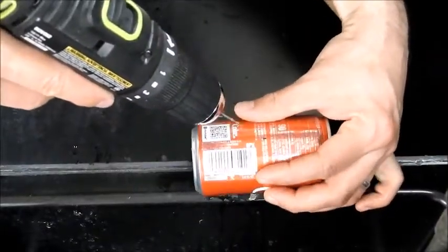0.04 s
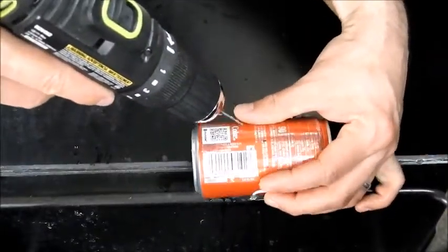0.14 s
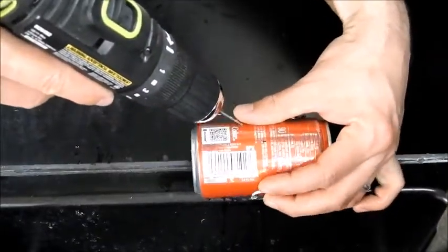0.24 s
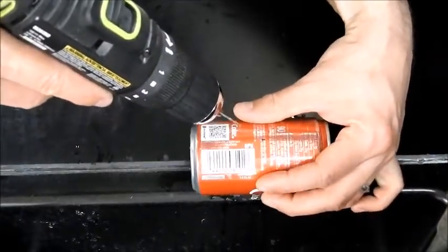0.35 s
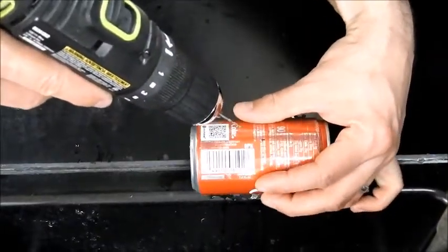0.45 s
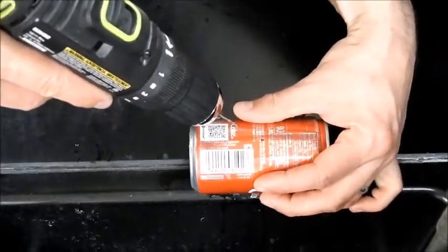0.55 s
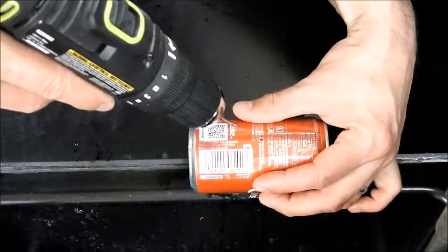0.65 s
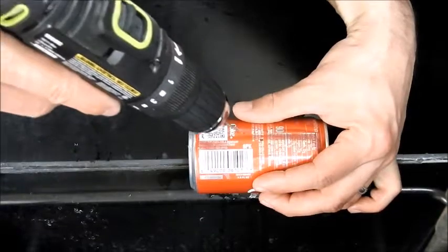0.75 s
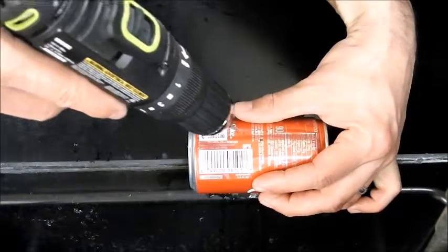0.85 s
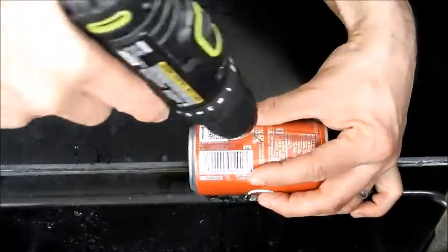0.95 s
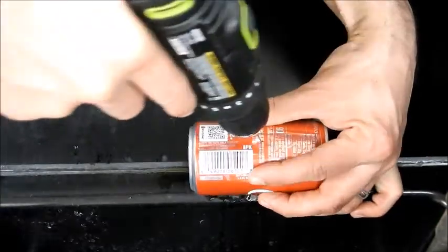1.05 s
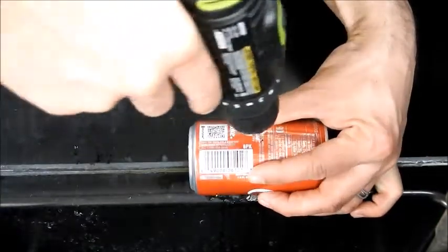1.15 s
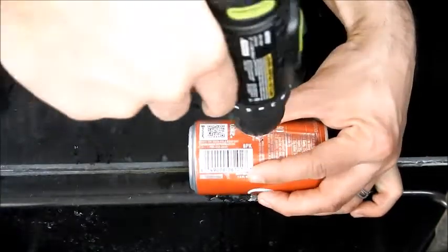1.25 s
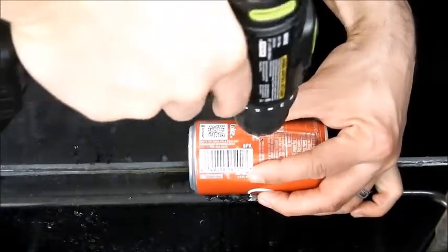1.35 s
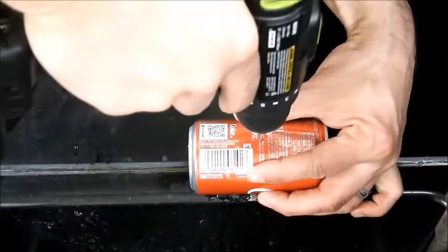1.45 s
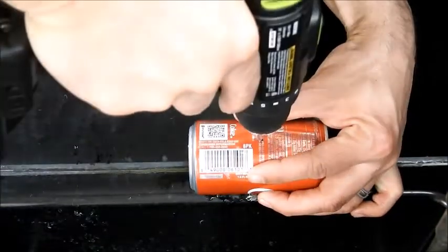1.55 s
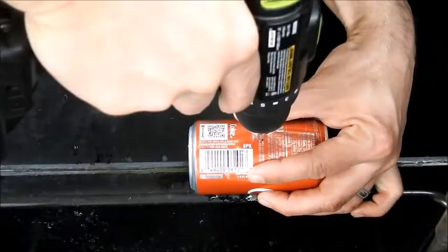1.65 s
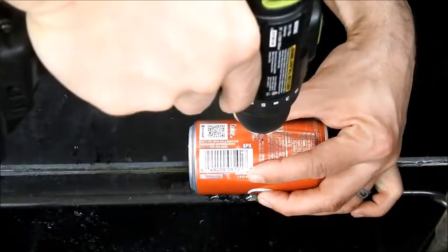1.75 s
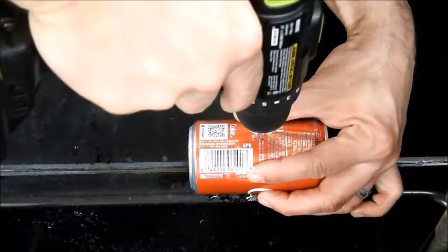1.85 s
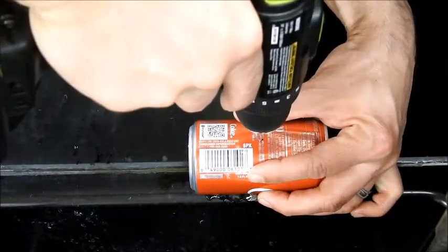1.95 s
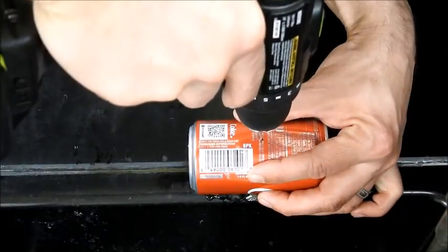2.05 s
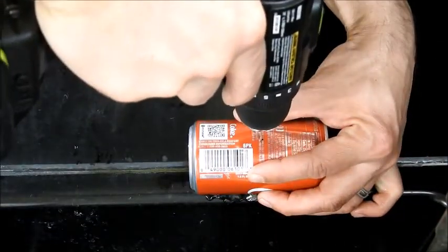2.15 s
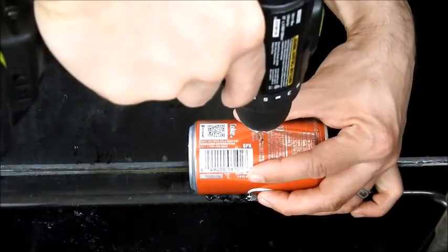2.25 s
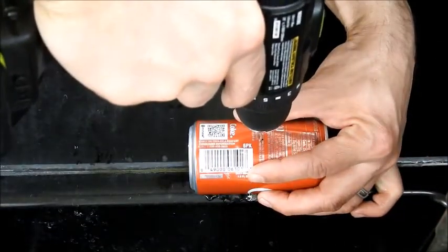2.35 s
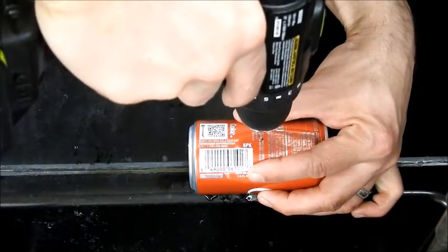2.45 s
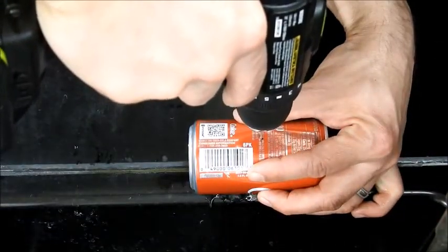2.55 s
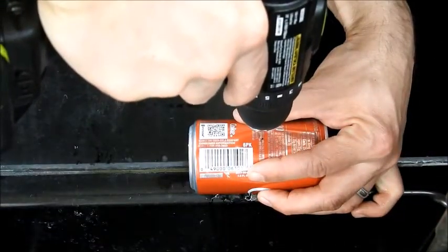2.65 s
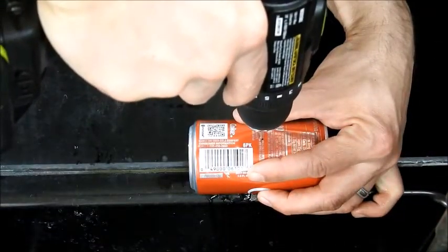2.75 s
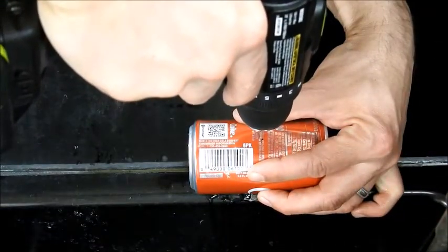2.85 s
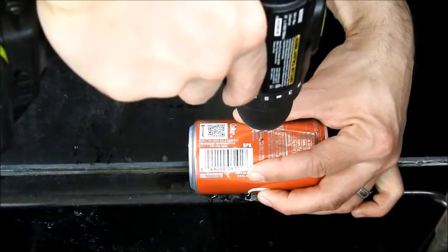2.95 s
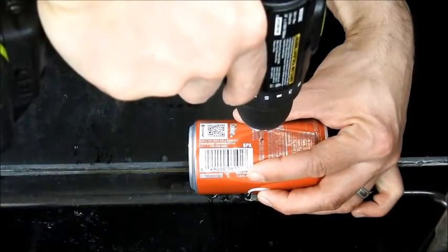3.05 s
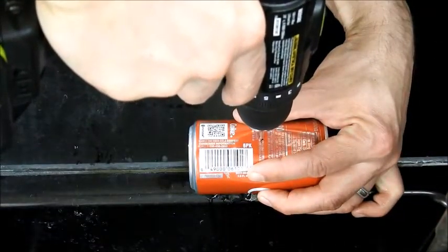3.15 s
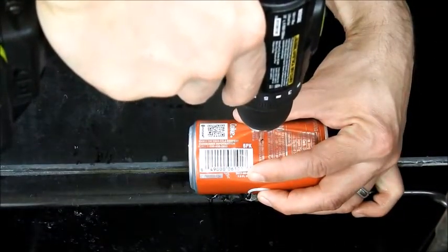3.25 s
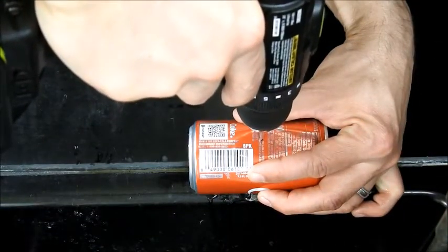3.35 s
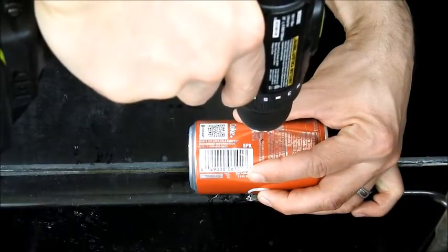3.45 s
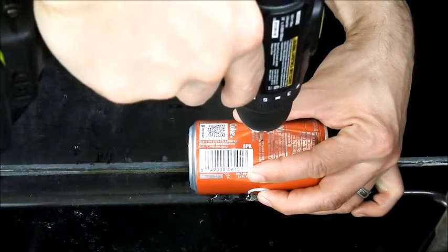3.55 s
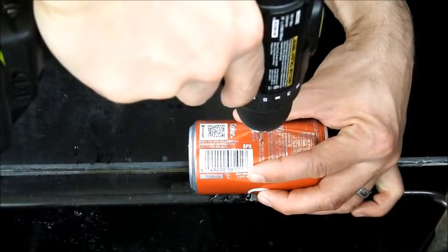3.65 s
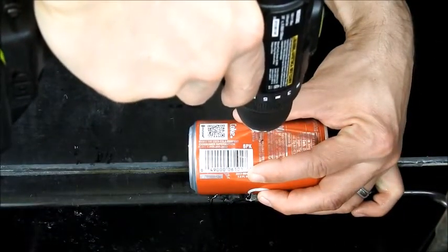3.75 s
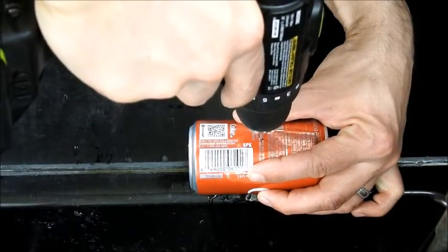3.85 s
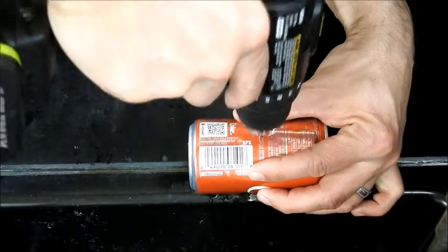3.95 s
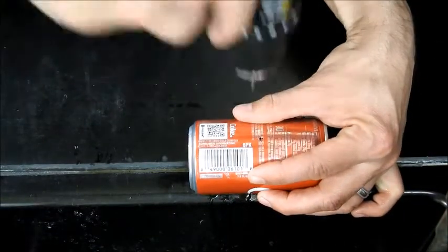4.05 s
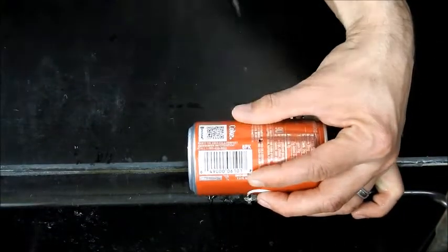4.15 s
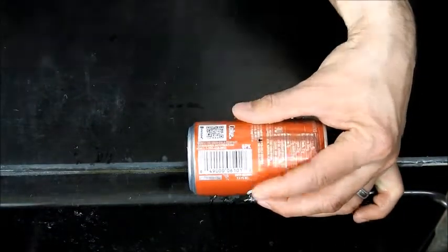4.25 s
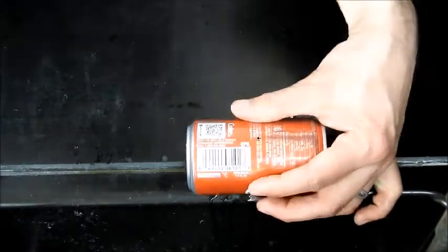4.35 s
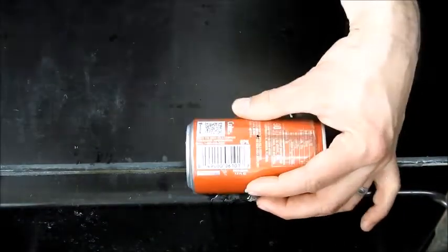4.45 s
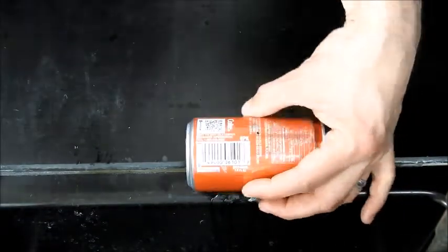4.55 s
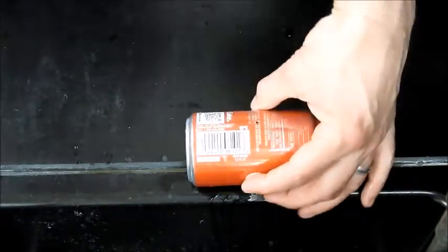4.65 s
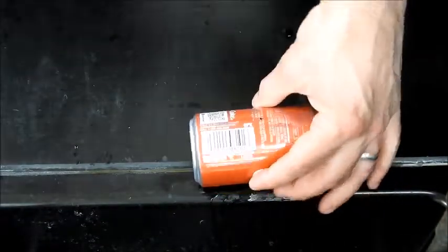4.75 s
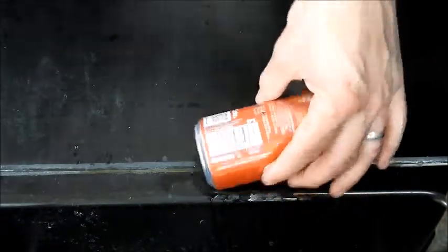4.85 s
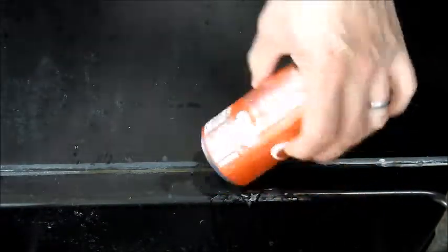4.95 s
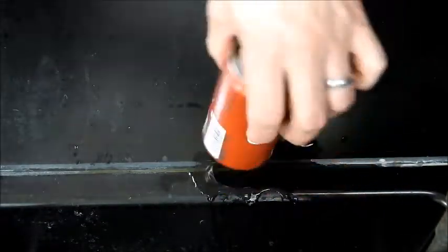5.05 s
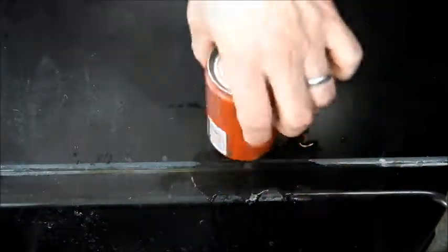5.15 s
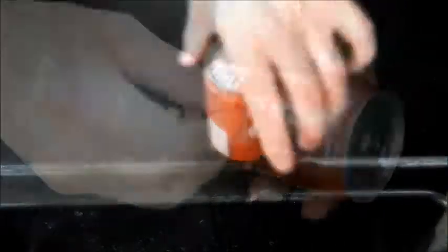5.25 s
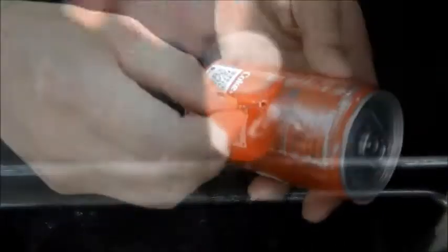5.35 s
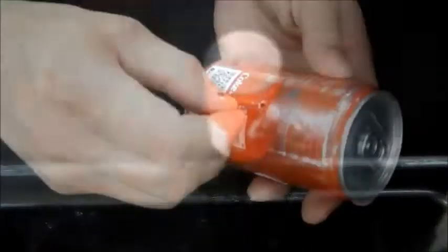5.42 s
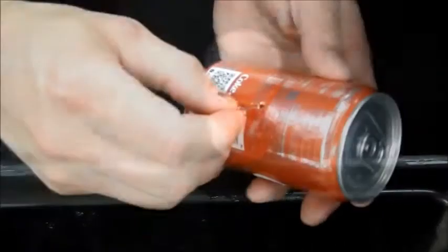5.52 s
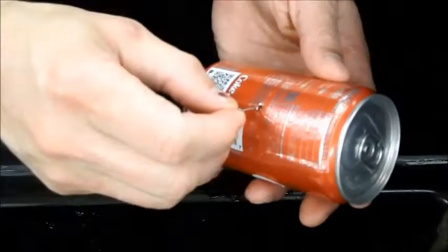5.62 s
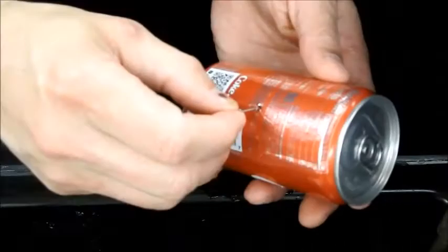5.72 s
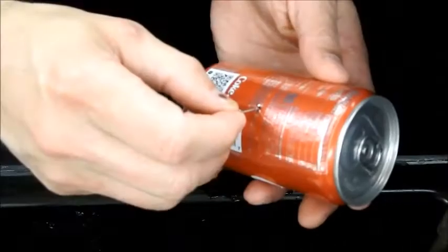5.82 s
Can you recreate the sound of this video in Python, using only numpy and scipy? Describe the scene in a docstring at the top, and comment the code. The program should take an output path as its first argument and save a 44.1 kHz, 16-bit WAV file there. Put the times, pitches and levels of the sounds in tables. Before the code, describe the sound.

Close, bright drill whine rising in two stages and braking abruptly, with scrapes before it and hollow knocks and a tinny pop afterwards.

```python
"""A drill bit rasps on a thin aluminium can over a low rumble, and the can knocks on a plastic tub.
The sound drops out briefly; then a squeal leads into a cordless drill spinning up in two steps, its whine
a sum of shaft orders and its hiss filtered noise. The bit catches, clacks and scratches, and the brake stops it.
Struck modes and noise bursts make more knocks, hands rub as swelling noise, and the can wall pops once.
Close microphone with two ports in a small room; the low rumble returns at the end."""
import sys
import numpy as np
from scipy import signal
from scipy.fft import rfft, irfft, next_fast_len
from scipy.io import wavfile
from scipy.ndimage import uniform_filter1d

SR = 44100
rng = np.random.default_rng(int(sys.argv[2]) if len(sys.argv) > 2 else 0)


def pcm_store(signal):
    """Save signal as 16-bit PCM."""
    levels = np.round(np.clip(np.atleast_2d(signal), -1, 1) * 32767)
    wavfile.write(sys.argv[1], SR, levels.astype(np.int16).T)


N = 259396
TIME = np.arange(N) / SR
EDGE_HZ = 15760  # upper limit of the whole sound
POWER_ON_S, SWITCH_S = 1.457, 0.016  # motor current starts; length of the ramps in held()
# the brake bites ever harder, as this power of time, until the rotor stands
BRAKE_S, STOP_S, BRAKE_POWER = 4.04, 4.12, 3
# a brief drop in level: start_s, end_s, level_db
DROPOUT = (0.94, 0.98, -33)


def amp(db):
    """Converts a level in decibels to an amplitude ratio."""
    return 10 ** (np.asarray(db) / 20)


def unit(x):
    """Normalises a signal to a root mean square of one."""
    return x / np.sqrt(np.mean(x ** 2) + 1e-20)


def curve(rows, axis=1):
    """Interpolates one column of a table linearly over time."""
    rows = np.array(rows)
    return np.interp(TIME, rows[:, 0], rows[:, axis])


def read(points, hz):
    """Interpolates a spectrum along a logarithmic frequency axis."""
    f, value = np.transpose(points)
    return np.interp(np.log(hz + 1), np.log(f + 1), value)


def peaks(modes, hz):
    """Sums in dB the bell-shaped lifts that resonances give at these frequencies."""
    return sum(db / (1 + (2 * (hz - f) / width) ** 2) for f, width, db in modes)


def band(centre, octaves):
    """A hump around one frequency, even in octaves: gives a function from Hz to dB."""
    def hump(hz):
        away = (np.log2((hz + 1) / centre) / octaves) ** 2
        return -20 * np.log10(1 + away) - away ** 2 / 2
    return hump


def colour(x, spectrum):
    """Filters by a spectrum, given as a function from Hz to dB, in the frequency domain; rms one."""
    length = x.shape[-1]
    size = next_fast_len(length, True)
    gain = amp(spectrum(np.fft.rfftfreq(size, 1 / SR)))
    return unit(irfft(rfft(x, size) * gain, size)[..., :length])


def wander(rate_hz, t=TIME, size=8192):
    """Band-limited chance of rms one: glides between random values, two per cycle of the rate."""
    return unit(np.interp(2 * rate_hz * t, np.arange(size), rng.standard_normal(size)))


def noise_pair(side_db, size=N):
    """Partly coherent white noise: the ports share a mid part and differ by a side part."""
    mid, side = rng.standard_normal((2, size))
    return np.array([mid + amp(side_db) * side, mid - amp(side_db) * side])


def add(mix, s, sound):
    """Superposes a sound on the mix from time s."""
    part = mix[:, round(s * SR):][:, :sound.shape[-1]]
    part += sound[..., :part.shape[-1]]


def burst(spectrum, t60, rise, side_db, size=8192):
    """A puff of coloured noise under an exponential rise and decay that peaks at one."""
    t = TIME[:size]
    shape = np.exp(-np.log(1000) * t / t60) * (1 - np.exp(-t / rise))
    return colour(noise_pair(side_db, size), spectrum) * shape / shape.max()


def puff(centre, octaves, t60, rise=.001, side_db=-8):
    """A decaying burst of noise around one frequency."""
    return burst(band(centre, octaves), t60, rise, side_db)


def ring(modes, size=32768):
    """Modal synthesis: struck modes superpose, each with its own exponential decay."""
    t = TIME[:size]
    return sum(amp(db) * np.exp(-np.log(1000) * t / t60) * np.sin(2 * np.pi * hz * t) for hz, db, t60 in modes)


def held(start, end):
    """A gate of one between two moments, zero outside, with short linear ramps."""
    return np.clip(np.minimum(TIME - start, end - TIME) / SWITCH_S + .5, 0, 1)


def since(s):
    """Seconds elapsed after a moment, zero before it."""
    return np.maximum(TIME - s, 0)


def background(spectrum, gain, side_db):
    """Stationary coloured noise under a slowly varying gain."""
    return gain * colour(noise_pair(side_db), lambda hz: read(spectrum, hz))


def surroundings():
    """Rumble, room tone and thin hiss are coloured noise; hand rubs add Gaussian swells in power."""
    # spectra: frequency_hz, relative density_db
    rumble_spectrum = [(25, -18.5), (85, 1.5), (140, -2), (260, -9.5), (400, -9), (1000, -16), (1700, -21),
                       (3200, -28.5), (5500, -28), (6600, -26.5), (8200, -36.5), (15500, -47)]
    room_spectrum = [(30, -17), (90, -11.5), (160, 1.5), (240, 2), (380, -4), (480, -8.5), (650, -9.5),
                     (760, -8), (1100, -11), (2200, -16), (4000, -27), (8000, -29.5), (15500, -43)]
    air_spectrum = [(1000, -17.5), (3000, -0.5), (6000, -7.5), (9500, -5), (13000, 1), (15800, -10)]
    # a low rumble before and after the drilling: start_s, end_s, first level_db, drift_db_per_s
    rumble_spans = [(0, 0.952, -44.5, -3), (5.206, 5.9, -58.5, 2.5)]
    # hands slide over the can: middle_s, length_s, low rustle_db, hiss_db
    hand_rubs = [(4.534, 0.19, -78, -67), (5.473, 0.16, -61, -60.5), (5.532, 0.035, -49, -74),
                 (5.633, 0.076, -53, -57.5), (5.864, 0.11, -53.5, -80)]
    low_side_db = -15  # difference between the ports, relative to what they share

    # room tone and thin hiss begin with the dropout, loud, and settle after it
    awake = TIME > DROPOUT[0]
    settling = np.exp(-since(DROPOUT[1]) / .22)
    # the room tone sinks under the motor
    sunk = (1 - np.exp(-since(POWER_ON_S) / .22)) * held(0, STOP_S)
    tone = awake * amp(-63.5 + 15 * settling - 6.5 * sunk)
    high = awake * amp(-70.5 + 8.5 * settling)
    low = sum(held(start, end) * amp(db + drift * since(start)) for start, end, db, drift in rumble_spans)
    for s, length, rustle_db, hiss_db in hand_rubs:
        swell = np.exp(-2 * ((TIME - s) / length) ** 2)
        low = np.hypot(low, amp(rustle_db) * swell)
        high = np.hypot(high, amp(hiss_db) * swell)
    high = high * held(0, 5.69)  # the thin hiss ends early
    return (background(rumble_spectrum, low, low_side_db)
            + background(room_spectrum, tone, low_side_db)
            + background(air_spectrum, high, side_db=-3.5))


def rasps(chatter=.55, chatter_hz=215):
    """Metal scrapes on metal: decaying noise bursts, amplitude-modulated by chatter."""
    # the bit is set on the can, takes up the drive and is pulled out:
    # start_s, level_db, centre_hz, width_octaves, t60_s
    scrapes = [(0, -38.5, 5800, .5, .13), (.04, -44.5, 2270, .65, .041), (.053, -42.5, 5500, .36, .022),
               (1.457, -52, 1540, .25, .18), (4.006, -55, 600, .3, .2), (4.0143, -34.5, 5900, .5, .14)]
    out = np.zeros((2, N))
    for s, db, centre, octaves, t60 in scrapes:
        add(out, s, amp(db) * puff(centre, octaves, t60))
    return out * (1 + chatter * np.sin(2 * np.pi * chatter_hz * TIME))


def bumps(octaves=.92, t60_s=.096):
    """Dull impacts of the drill on the held can: damped, low-centred noise bursts."""
    # start_s, level_db, centre_hz
    impacts = [(.039, -34.5, 300), (4.1, -49.5, 1090)]
    out = np.zeros((2, N))
    for s, db, centre in impacts:
        add(out, s, amp(db) * puff(centre, octaves, t60_s, side_db=-11))
    return out


def knocks(modes_db=-4, boom_db=-10):
    """Can strikes tub: an impact excites sparse modes, a dense hollow boom and a metal tick."""
    # start_s, thud_db, tick_db
    strikes = [(.376, -41, -63), (4.273, -69, -53), (4.7707, -29, -32), (4.791, -48, -38.5),
               (4.8025, -36.5, -40.5), (4.82, -39.5, -42), (4.866, -45, -46)]
    # modes of can and tub together: frequency_hz, level_db, t60_s
    tub_modes = [(97.2, -28, 1.6), (295, -11, .22), (637, -3, .17), (668, -3, .08), (727, 1, .08),
                 (790, -5, .05), (1025, -6, .1), (1700, -19, .23)]
    # spectra of the tub's dense boom and of the tick: frequency_hz, relative density_db
    boom_spectrum = [(30, -45), (70, -29), (130, -3), (330, -2), (560, -13), (700, -3.5), (1100, -1.5),
                     (1650, -13.5), (2200, -26), (8000, -45)]
    tick_spectrum = [(200, -3), (1000, -11), (2300, -7), (3700, 1), (5800, 0.5), (7300, -6), (8500, -6),
                     (11000, -3.5), (15500, -10)]
    out = np.zeros((2, N))
    for s, thud_db, tick_db in strikes:
        boom = burst(lambda hz: read(boom_spectrum, hz), t60=0.21, rise=0.0008, side_db=-19)
        tick = burst(lambda hz: read(tick_spectrum, hz), t60=0.03, rise=0.00018, side_db=-4.5)
        add(out, s, amp(thud_db + modes_db) * ring(tub_modes))
        add(out, s, amp(thud_db + boom_db) * boom)
        add(out, s, amp(tick_db) * tick)
    return out


def squeal():
    """The speed control whistles as the trigger is first squeezed: a gliding, stuttering sinusoid."""
    # time_s, pitch_hz, level_db
    whistle = [(1.42, 10600, -66), (1.447, 10950, -54), (1.465, 12400, -50), (1.478, 13200, -34),
               (1.505, 13900, -53)]
    on = (TIME > whistle[0][0]) & (TIME < whistle[-1][0])
    level = uniform_filter1d(on * 1., size=100) * amp(curve(whistle, axis=2))
    stutter = 1 + .5 * wander(120)
    return level * stutter * np.sin(2 * np.pi * np.cumsum(curve(whistle)) / SR)


def braking():
    """Progress of the braking, linear in time from 0 to 1."""
    return np.minimum(since(BRAKE_S) / (STOP_S - BRAKE_S), 1)


def motor_speed(spin_up_s=.026):
    """Turns per second: rotor inertia lags the trigger as a first-order system; the brake then stops it."""
    # the trigger is pulled halfway, then fully: start_s, asked speed_turns_per_s, drift_turns_per_s2
    trigger_pulls = [(1.469, 327.5, 285), (1.793, 543.4, -3.1)]
    asked = np.zeros(N)
    for s, speed, drift in trigger_pulls:
        asked = np.where(TIME > s, speed + drift * since(s), asked)
    keep = np.exp(-1 / (spin_up_s * SR))
    return signal.lfilter([1 - keep], [1, -keep], asked) * (1 - braking() ** BRAKE_POWER)


def housing(hz):
    """Radiation in dB: the brush and gear hiss spectrum lifted by the housing resonances."""
    # frequency_hz, relative density_db
    hiss_spectrum = [(100, -39), (250, -35), (900, -34), (1500, -27.5), (1780, -28.5), (2050, -22.5),
                     (4200, -17.5), (7300, -20), (8500, -14.5), (10500, -13), (12400, -1), (13600, -1),
                     (14500, -8), (15800, -13)]
    # frequency_hz, width_hz, lift_db
    housing_modes = [(1173, 190, 6), (2663, 148, 10), (3435, 200, 7.5), (5700, 450, 5)]
    return read(hiss_spectrum, hz) + peaks(housing_modes, hz)


def brushes(turns, pole_depth=0.23, turn_depth=0.18, flutter_db=0.94):
    """Brush and gear hiss: noise amplitude-modulated by each pole and each turn of the rotor."""
    angle = 2 * np.pi * turns
    gate = 1 + pole_depth * np.cos(3 * angle) + turn_depth * (np.cos(angle) + np.sin(2 * angle))
    flutter = amp(flutter_db * wander(600))
    return colour(noise_pair(side_db=-13) * gate * flutter, housing)


def whine(turns, speed, waver=0.099, strain=1.6, waver_hz=14, spread=0.57, low_cut_hz=420, count=44):
    """Order synthesis: multiples of shaft speed glide through resonances, wavering with the gear play."""
    # strong orders, strongest on multiples of the three rotor poles: multiple, level_db over 1 Hz of hiss
    strong_orders = [(1, 34.7), (2, 25), (3, 39.8), (5, 22), (5.92, 25), (6, 23), (9.34, 21), (15, 34),
                     (18, 32.4), (19, 25), (21, 34.2), (23, 28), (24, 25), (27, 31.7), (30, 25), (33, 28),
                     (36, 32), (37, 30)]
    # an order sings out as it crosses its own mode: multiple, frequency_hz, width_hz, lift_db
    swept_modes = [(3, 1170, 320, 10), (6, 2190, 320, 10), (15, 5660, 280, 13), (18, 6400, 450, 14),
                   (27, 10800, 480, 14), (30, 12000, 600, 16), (33, 12800, 1000, 10)]
    full_order = 15  # fading and wavering act fully from this multiple up

    grid = np.arange(SR // 2)
    hiss = amp(housing(grid))
    response = hiss / np.linalg.norm(hiss) * (grid < EDGE_HZ) / (1 + (low_cut_hz / (grid + 1)) ** 6)
    on = speed > 0
    t, mid, side = TIME[on], 0, 0
    lag = 1 - speed[on] / speed.max()
    play = waver + strain * lag  # below full speed the gears run less evenly
    # below full speed the strong orders fade and the weak ones between them grow
    strong = [(k, db - 27 * lag * min(k / full_order, 1)) for k, db in strong_orders]
    taken = np.round(strong_orders)[:, 0]
    weak = [(k, 15 + 17 * lag) for k in range(4, count) if k not in taken]
    for multiple, db in strong + weak:
        hz = multiple * speed[on]
        lift = peaks([mode for k, *mode in swept_modes if round(k) == round(multiple)], hz)
        radiated = response[np.minimum(hz.astype(int), len(grid) - 1)]
        unsteady = 1 + play * min(multiple / full_order, 1) * wander(waver_hz, t)
        gain = amp(db + lift) * radiated * unsteady
        angle = np.float32(2 * np.pi * ((multiple * turns[on] + rng.random()) % 1))
        mid += gain * np.cos(angle)
        # short waves reach the ports out of step
        side += gain * np.sin(angle) * spread * hz / EDGE_HZ * rng.choice([-1, 1])
    out = np.zeros((2, N))
    out[:, on] = mid + side, mid - side
    return np.sqrt(2) * out


def gear(turns, speed, count=9, rough=0.3):
    """Gear mesh tone at nine times shaft speed, amplified under power as it crosses each resonance."""
    # frequency_hz, width_hz, lift_db
    gearbox_modes = [(1350, 600, 20), (1970, 530, 10), (2590, 410, 19), (3360, 230, 18.5), (3890, 180, 28),
                     (4350, 300, 13), (4700, 160, 21)]
    level = amp(-67 + peaks(gearbox_modes, count * speed)) * held(POWER_ON_S, BRAKE_S)
    roughness = 1 + rough * wander(90)
    return np.sqrt(2) * level * roughness * np.sin(2 * np.pi * count * turns)


def rattle(speed):
    """Gear teeth clatter in their play: band noise whose amplitude is greatest at half speed."""
    share = speed / speed.max()
    clatter = colour(noise_pair(-20), band(centre=1100, octaves=1.2))
    return amp(-52.5) * 2 * share * (1 - share) * clatter


def drill(jitter=.0004):
    """One slightly unsteady shaft phase drives hiss, whine and gears, coupling their levels to speed."""
    catch_s, recovery_s = 3.914, 0.014  # the bit catches in the wall: hiss and whine dip, then recover
    speed = motor_speed() * (1 + jitter * wander(12))
    turns = np.cumsum(speed) / SR
    slow = np.exp(-(speed / 197) ** 2)  # near one while the rotor is slow
    caught = since(catch_s) / recovery_s
    dip = caught * np.exp(1 - caught)
    loose = held(catch_s, STOP_S)  # the loose bit whines less
    # under the brake the hiss dies away and the whine stands out
    hiss_gain = amp(-32 - 8 * slow - 1.5 * dip - 15 * braking() ** BRAKE_POWER)
    # whine level is relative to the hiss
    whine_gain = amp(-0.66 - 12 * slow - 13 * dip - 2.5 * loose + 4 * braking())
    motor = hiss_gain * (brushes(turns) + whine_gain * whine(turns, speed))
    running = held(POWER_ON_S, STOP_S - SWITCH_S / 2)
    return running * (motor + gear(turns, speed) + rattle(speed))


def clacks():
    """Bit and chuck impacts: short noise bursts whose spectral tilt sets their brightness."""
    # start_s, level_db, treble tilt_db, t60_s
    hits = [(3.9148, -24.5, 2, .014), (3.9405, -30.5, -1, .025), (3.9522, -29.5, -3, .04),
            (3.9815, -34, -8, .02), (4.0857, -30, -14, .025), (4.1085, -30, 9, .014)]
    # frequency_hz, relative density_db
    clack_spectrum = [(200, -15), (1400, -7), (2050, -9), (2750, 3), (3600, -7), (4500, 1), (6200, -13),
                      (12500, -7), (15800, -16)]
    out = np.zeros((2, N))
    for s, db, tilt_db, t60 in hits:
        hit = burst(lambda hz: read(clack_spectrum, hz) + tilt_db * hz / EDGE_HZ, t60, rise=.0003, side_db=-10)
        add(out, s, amp(db) * hit)
    return out


def scratch(grain_db=5, grain_per_s=250):
    """The loose bit's flutes scratch the torn rim of the hole: band noise with random gritty modulation."""
    # start_s, end_s, level_db, centre_hz, width_octaves
    start, end, db, centre, octaves = (3.938, 4.06, -46, 4500, 1.6)
    grit = unit(amp(grain_db * wander(grain_per_s)))
    return amp(db) * held(start, end) * grit * colour(noise_pair(-10), band(centre, octaves))


def pop(bright_db=8, dull_db=-12, dull_hz=8000):
    """Buckling: the thin wall snaps through with a crack, a brighter crackle and ringing modes."""
    # start_s, crack_db, crackle_db, ring_db
    s, crack_db, crackle_db, ring_db = (5.2262, -21, -31, -34.5)
    # frequency_hz, relative density_db
    crack_spectrum = [(90, -30), (300, -10.5), (1600, -14), (2700, 0.5), (3700, -0.5), (4400, -17),
                      (5500, -8), (6200, 6), (7600, -14), (8900, -6.5), (13300, -8), (15800, -22)]
    # modes of the can wall: frequency_hz, relative level_db, t60_s
    wall_modes = [(2900, -8, .19), (3424, -9, .14), (6160, -2, .22), (6182, -7, .25), (5227, -14, .2),
                  (6720, 3, .09), (8940, -1, 0.12), (8900, -8, 0.23), (9150, -9, 0.13), (10200, -10, 0.29),
                  (10960, -13, 0.19), (11840, -14, .09), (13250, -12, .1)]

    def dull(hz):
        return read(crack_spectrum, hz) + dull_db * (hz > dull_hz)

    def bright(hz):
        return read(crack_spectrum, hz) + bright_db * hz / EDGE_HZ

    out = np.zeros((2, N))
    add(out, s, amp(crack_db) * burst(dull, t60=0.017, rise=0.00019, side_db=-17))
    add(out, s, amp(crackle_db) * burst(bright, t60=0.13, rise=0.0053, side_db=-11))
    add(out, s, amp(ring_db) * ring(wall_modes))
    return out


def room(x, size=20000):
    """Diffuse reverberation: convolution with noise decaying by frequency, different at each port."""
    # frequency_hz, t60_s
    decay_times = [(200, 0.32), (1500, 0.21), (6000, 0.32), (14000, 0.19)]
    noise = rng.standard_normal((2, size)) * (TIME[:size] > .004)
    hz, t, z = signal.stft(noise, SR, nperseg=256)
    decay = np.exp(-np.log(1000) * t / read(decay_times, hz)[:, None])
    tail = signal.istft(z * decay, SR, nperseg=256)[1]
    return signal.fftconvolve(x, tail / np.linalg.norm(tail[0]), axes=1)[:, :N]


def narrow(pair, corner_hz=4500, low_share=0.18):
    """Spatial coherence: long waves reach both ports almost alike, so the low side signal shrinks."""
    mid, side = (pair[0] + pair[1]) / 2, (pair[0] - pair[1]) / 2
    low = signal.sosfilt(signal.butter(1, corner_hz, fs=SR, output="sos"), side)
    side = side - (1 - low_share) * low
    return np.array([mid + side, mid - side])


def late_treble(x, split_hz=7900, late_s=.0052):
    """Band-dependent delay: the treble above the split arrives a little late."""
    low = signal.oaconvolve(x, signal.firwin(401, split_hz, fs=SR)[None], "same", axes=1)
    add(low, late_s, x - low)
    return low


def scene(drill_room_db=-17, can_room_db=-15):
    """Superposes direct and reverberant sound of drill and can on the surroundings."""
    tool = drill() + rasps() + scratch() + bumps() + clacks() + squeal()
    can = knocks() + pop()
    wet = room(amp(drill_room_db) * tool + amp(can_room_db) * can)
    lean = amp([[-1], [.9]])  # the right port is a little louder
    return narrow(tool * lean + wet) + surroundings() * lean + can


def record(dry):
    """Delays the treble, gates the level down for a moment before the drilling, then limits the band."""
    start, end, db = DROPOUT
    gain = uniform_filter1d(np.where((TIME > start) & (TIME < end), amp(db), 1), size=60)
    low_pass = signal.firwin(801, EDGE_HZ, window=("kaiser", 9), fs=SR)[None]
    return signal.oaconvolve(late_treble(dry) * gain, low_pass, "same", axes=1)


dry = scene()
out = record(dry)
pcm_store(out)
```